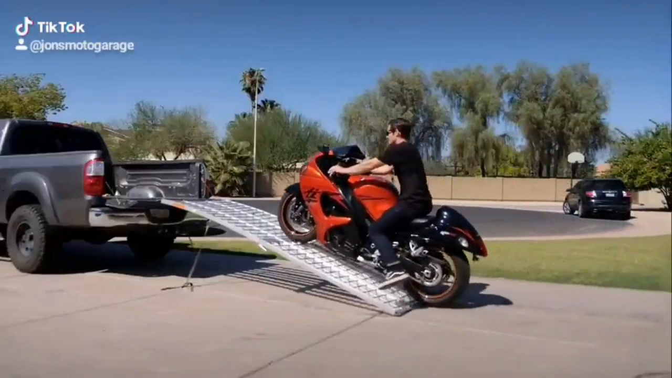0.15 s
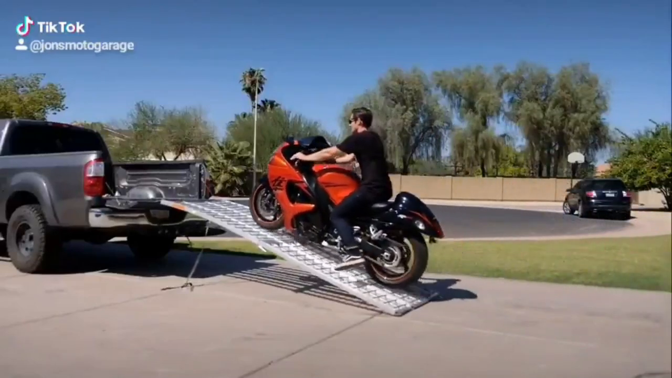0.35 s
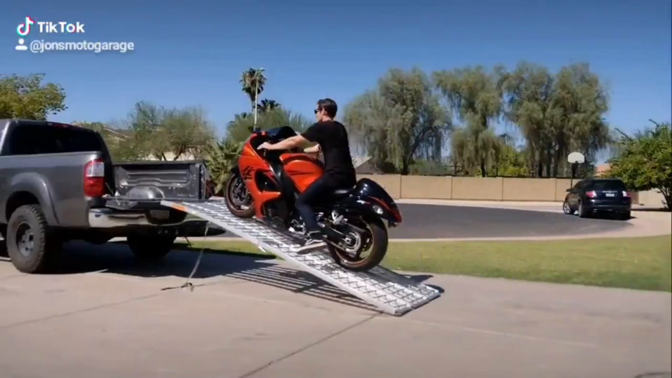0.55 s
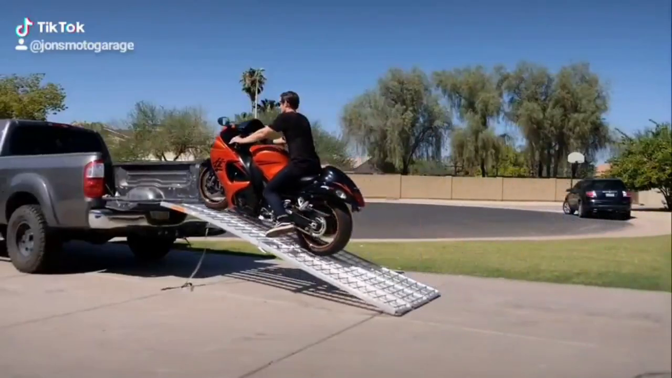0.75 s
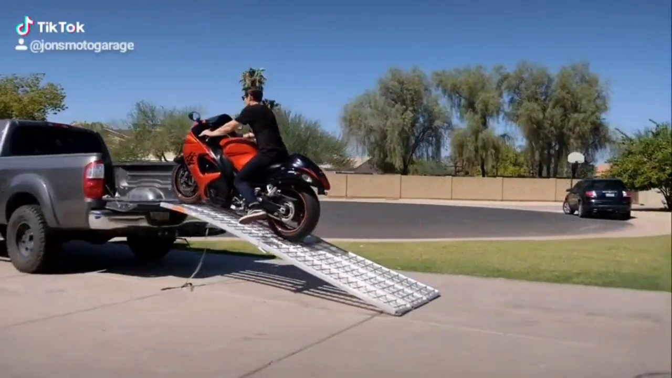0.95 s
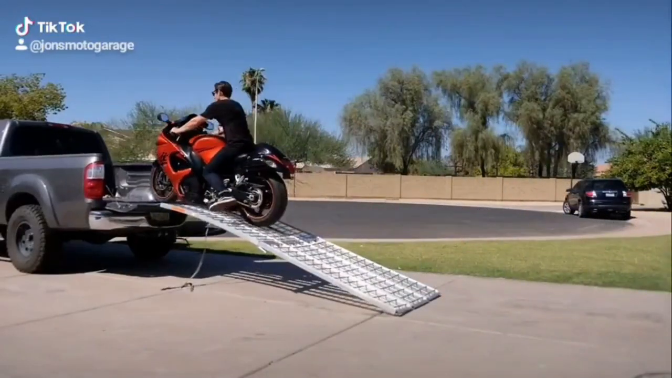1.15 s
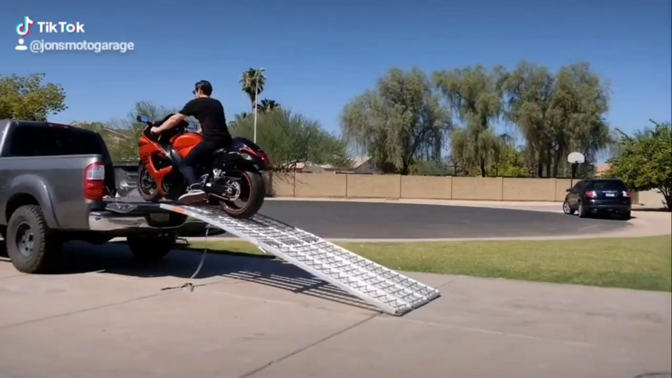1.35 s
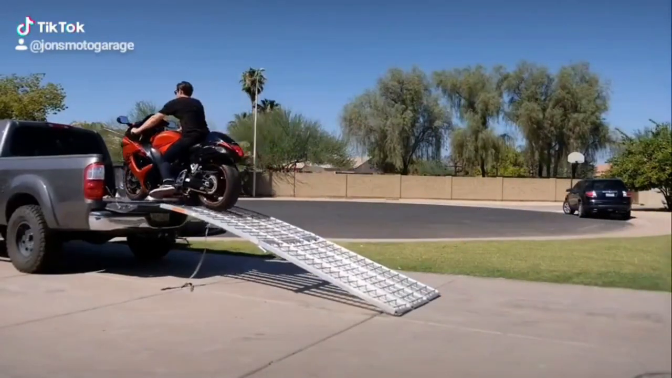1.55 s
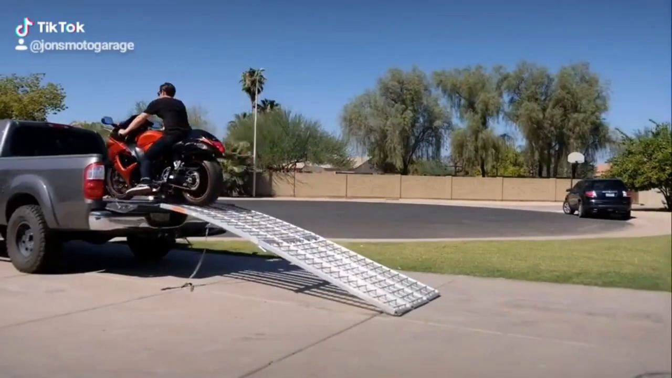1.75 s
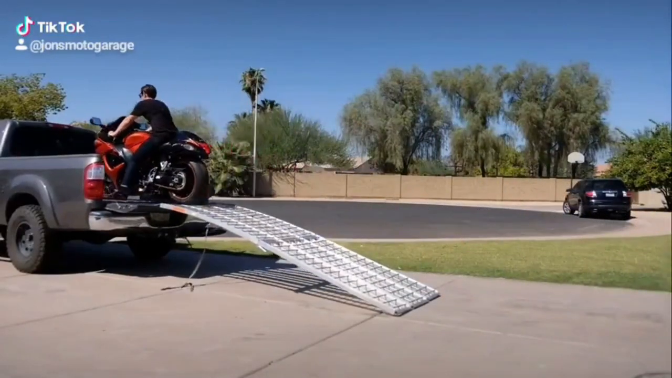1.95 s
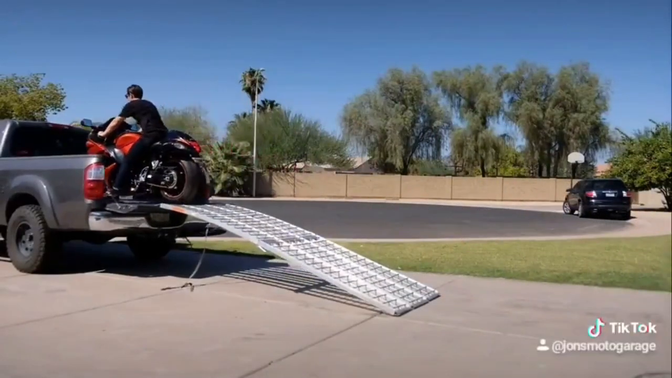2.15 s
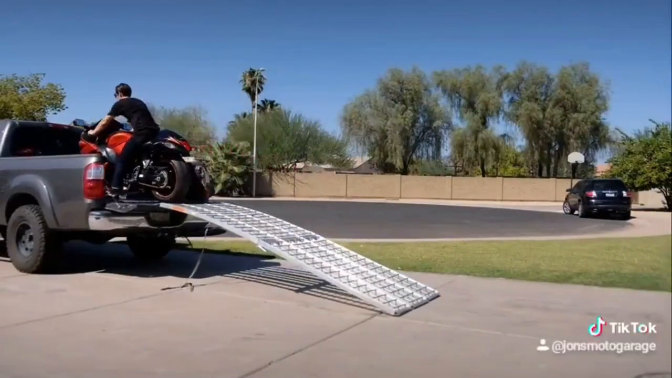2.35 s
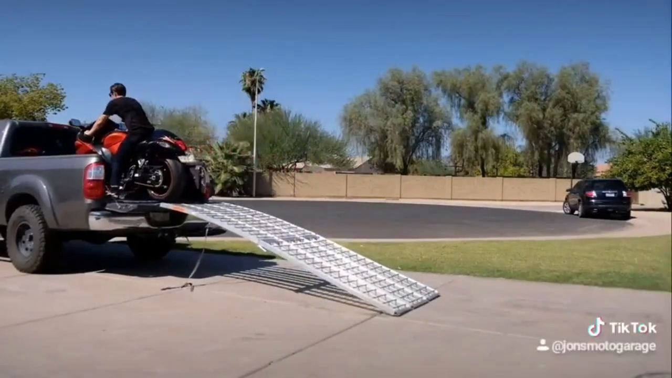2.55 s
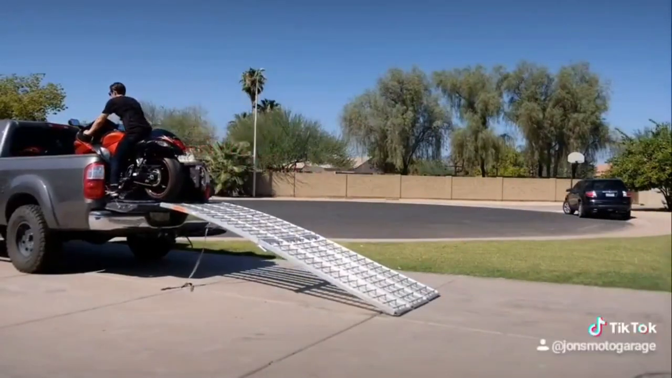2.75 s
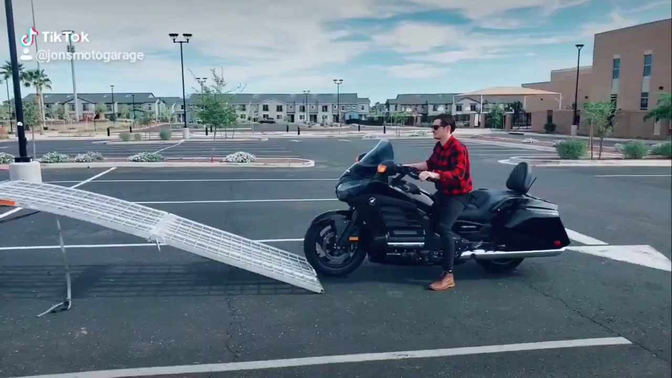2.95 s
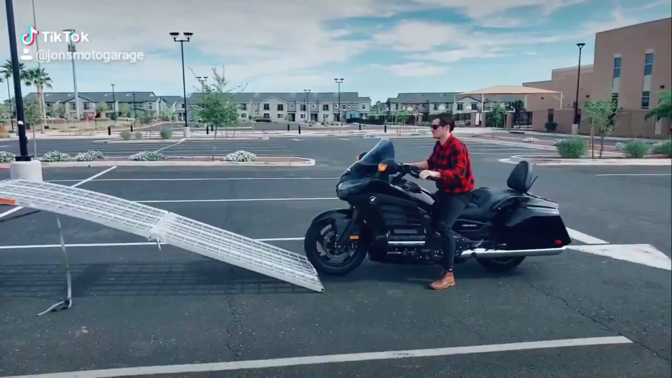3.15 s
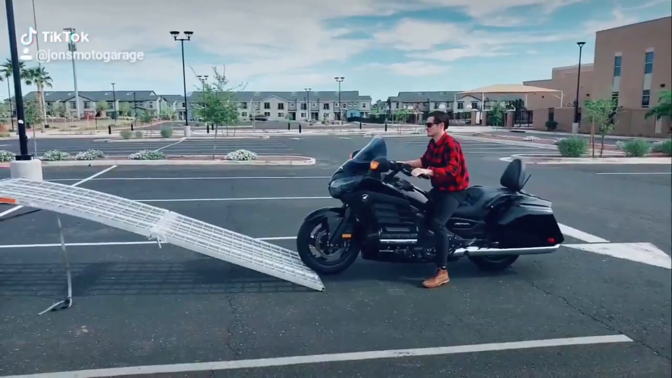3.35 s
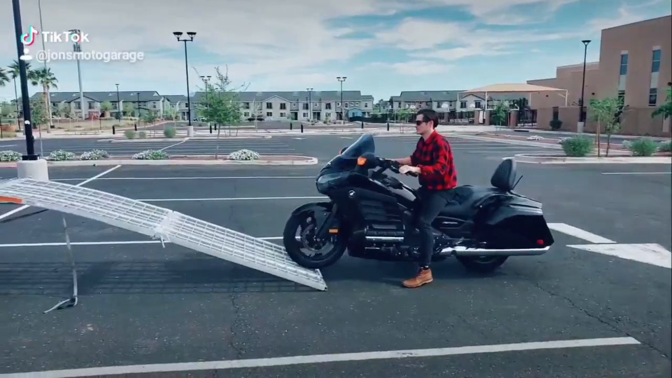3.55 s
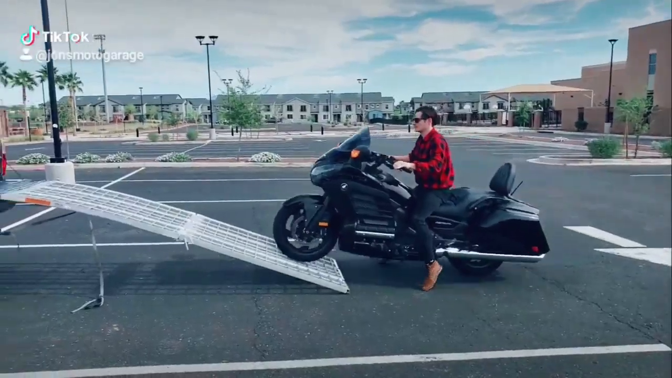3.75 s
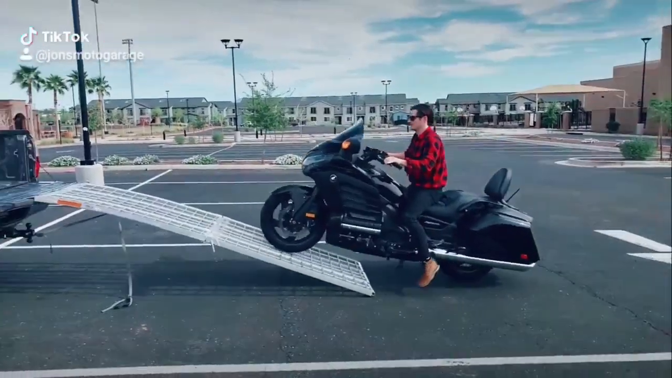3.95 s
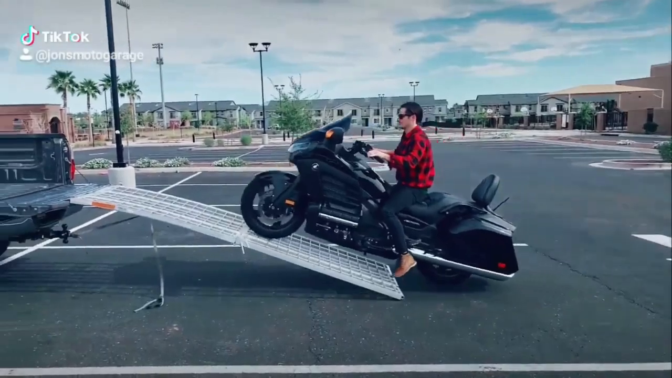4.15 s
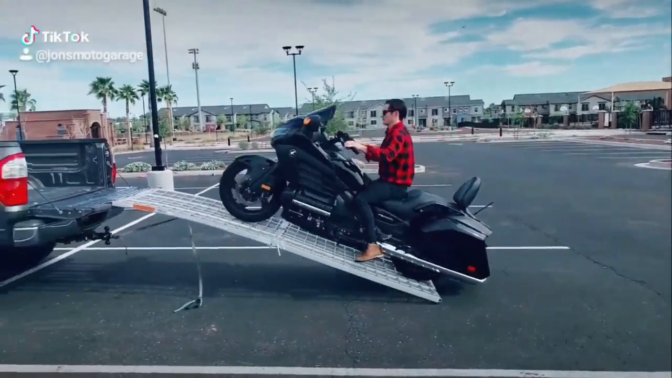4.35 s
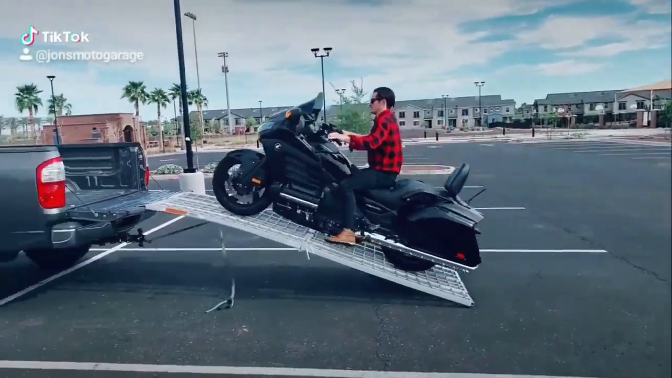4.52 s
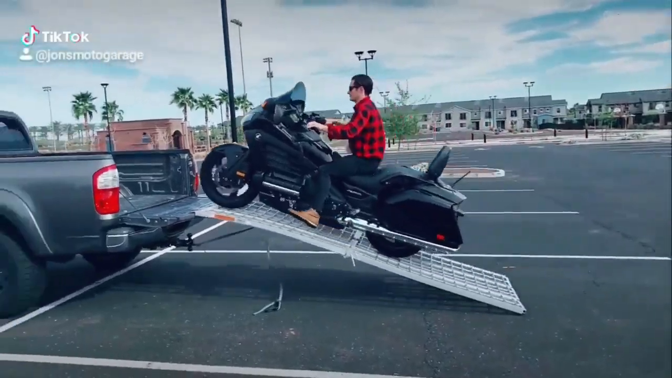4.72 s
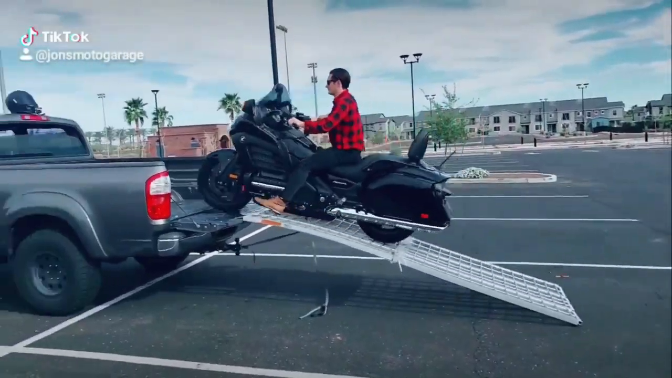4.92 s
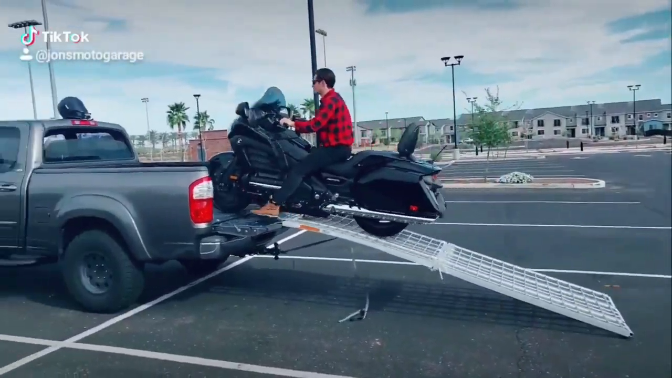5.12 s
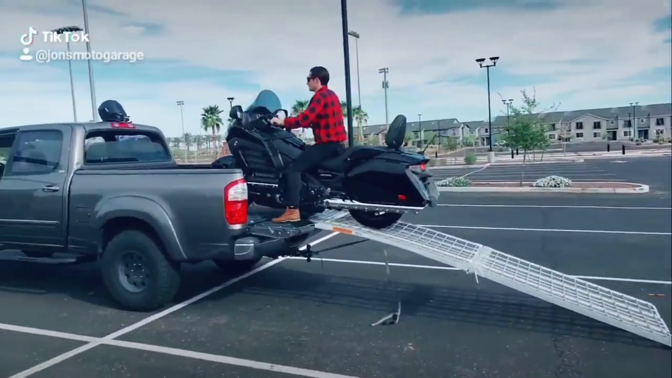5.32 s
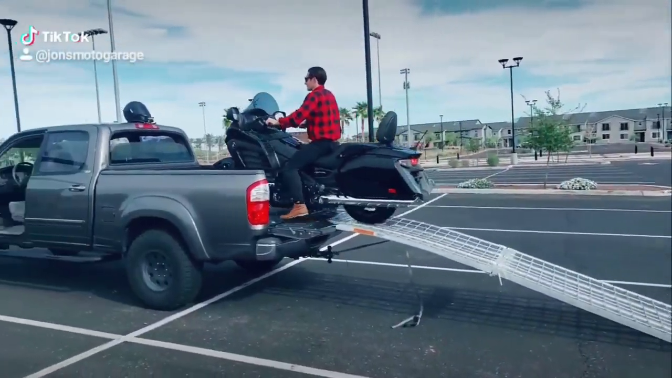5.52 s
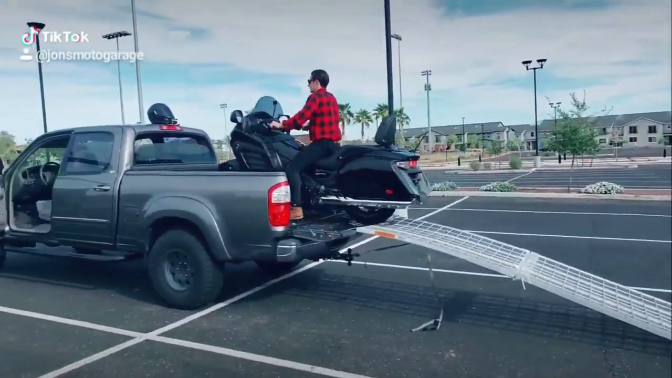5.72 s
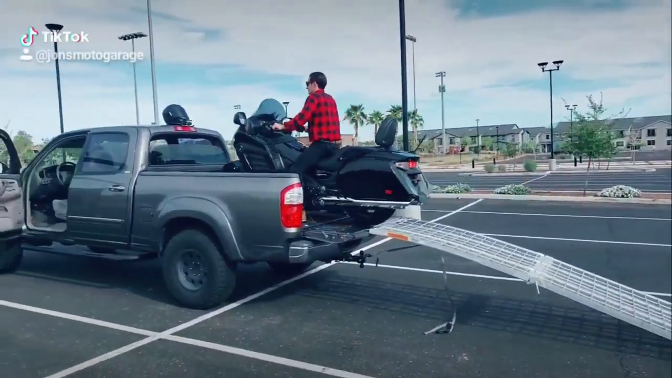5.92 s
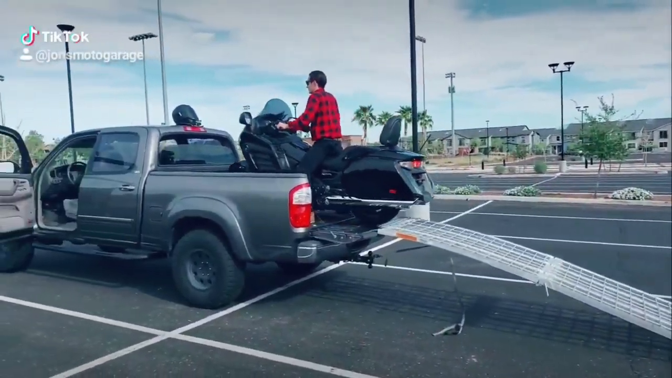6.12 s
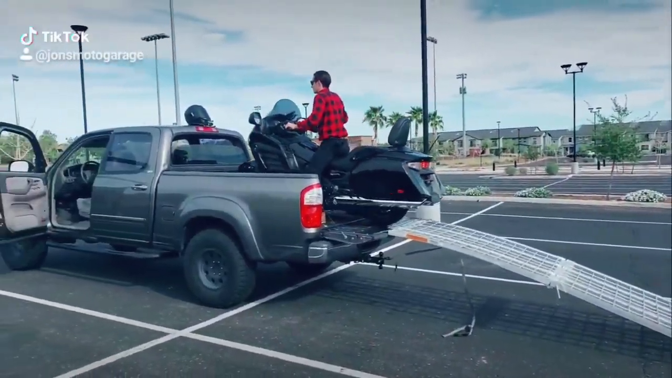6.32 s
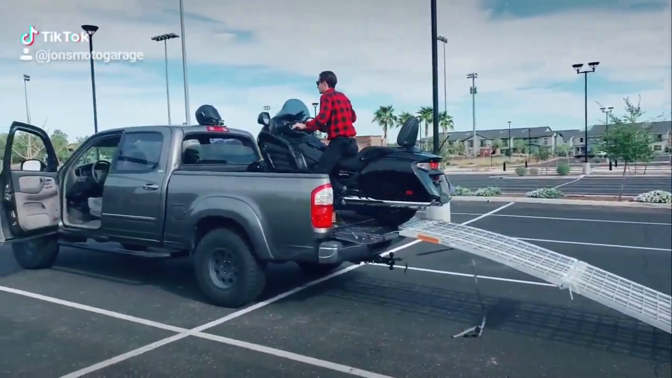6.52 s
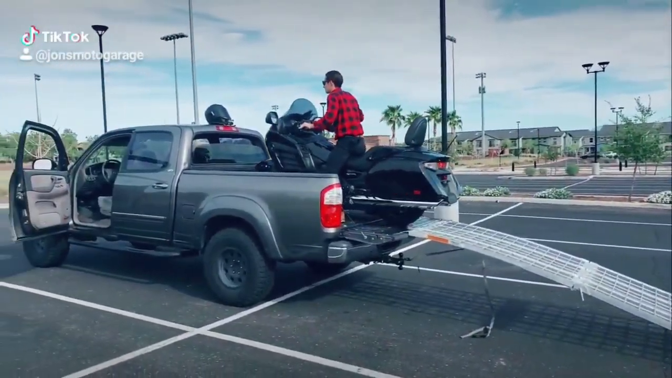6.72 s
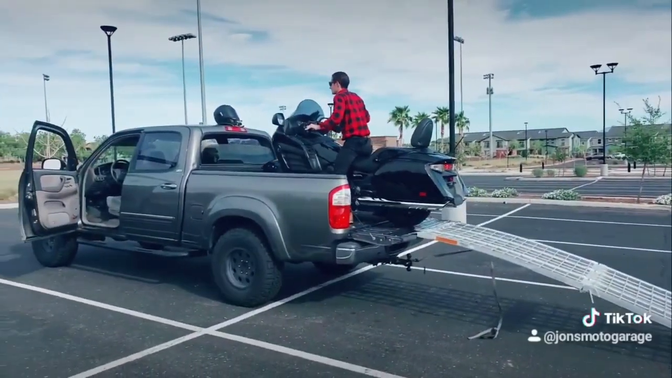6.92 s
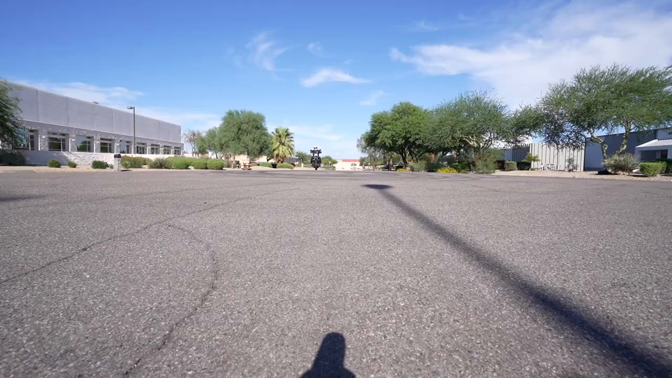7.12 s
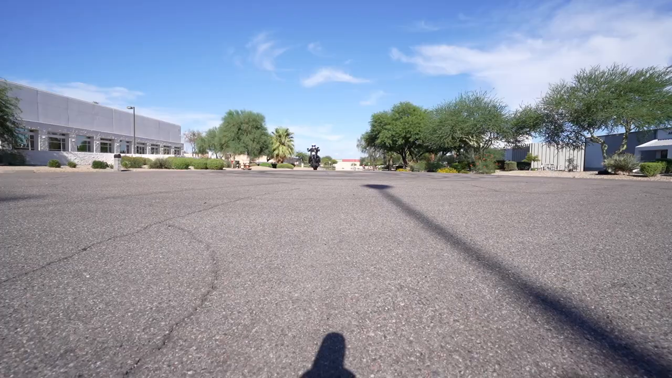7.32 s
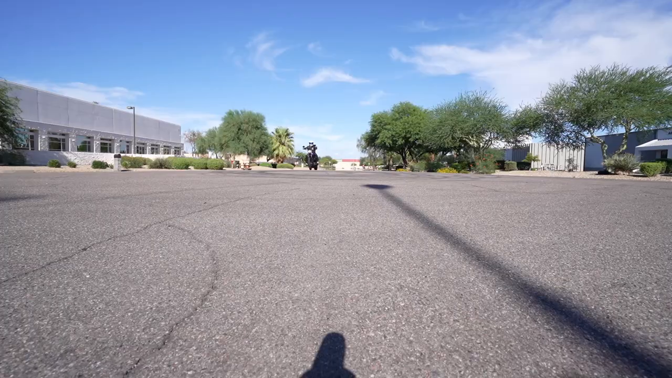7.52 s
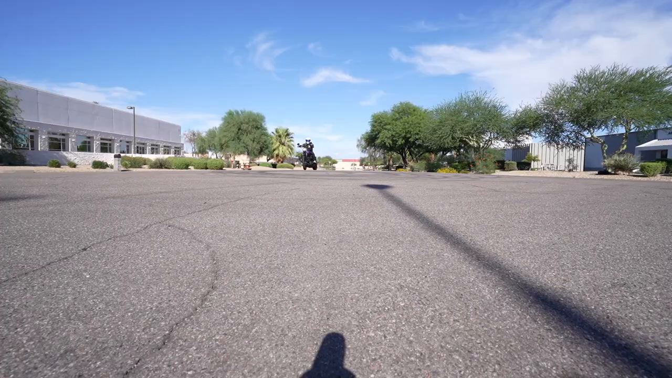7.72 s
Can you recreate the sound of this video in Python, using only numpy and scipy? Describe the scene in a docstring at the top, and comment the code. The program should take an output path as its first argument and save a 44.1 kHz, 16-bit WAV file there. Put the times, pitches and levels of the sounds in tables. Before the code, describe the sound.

A sport motorcycle pulls up a metal loading ramp with a booming engine, then drops to an uneven idle, with two sharp clanks. After an abrupt cut, a deeper touring motorcycle revs with whining gears as the ramp rattles and clanks loudly. It slows and creeps along a truck bed, growing muffled. Finally a distant bike howls briefly at high revs. All is outdoors, with light wind on the microphone.

```python
"""Motorcycles ride up an aluminium ramp into a pickup, in three outdoor scenes cut together.
A four-cylinder sport bike climbs and drops to idle. A six-cylinder touring bike with whining gears
climbs while the ramp rattles and clanks, then creeps along the truck bed. Last, a far bike speeds
across an open lot. Each engine is a stream of pulses, one per firing, shaped by its pipes and casing.
Ramp and truck bed ring when struck. Behind it all are soft outdoor noise and wind on the microphone."""
import sys
import numpy as np
from scipy import signal
from scipy.fft import rfft, irfft, next_fast_len
from scipy.io import wavfile
from scipy.ndimage import uniform_filter1d

SR = 44100
rng = np.random.default_rng(int(sys.argv[2]) if len(sys.argv) > 2 else 0)


def store_pcm(level_fs):
    """Save levels as 16-bit WAV."""
    pcm = np.round(np.clip(level_fs, -1, 1) * 32767).astype(np.int16)
    wavfile.write(sys.argv[1], SR, np.atleast_2d(pcm).T)


N = 342641
TIME = np.arange(N) / SR
FIRST_END_S, SECOND_START_S = 2.857, 2.901   # the gap between the first two scenes

# The revs sag on the ramp, flare at the top, then wander around idle: (time [s], speed [firings/s])
SPORT_SPEED = [(0, 101.4), (.164, 95.8), (.266, 96), (.436, 95), (.622, 96.4), (.694, 89), (.734, 89.7),
               (.96, 94), (1.256, 90.4), (1.31, 96.5), (1.356, 87), (1.45, 74), (1.53, 57), (1.65, 40.3),
               (1.76, 31), (1.88, 48), (1.98, 42.7), (2.06, 43), (2.16, 36.7), (2.3, 42.6), (2.46, 37.5),
               (2.58, 32.1), (2.86, 37.5)]
# Opened for the ramp, eased, shut at the top, then the idle catches: (time [s], throttle [0-1])
SPORT_THROTTLE = [(0, 0.57), (.13, 0.98), (.22, 1), (.45, 1), (.62, 0.83), (.8, 0.76), (.93, 0.76),
                  (1.25, 0.64), (1.315, 0.8), (1.37, 0.24), (1.43, 0.18), (1.73, 0.06), (1.87, 0.39),
                  (2.02, 0.31), (2.3, 0.24)]
# Each cylinder in firing order: (strength [dB])
SPORT_CYLINDERS = [1.6, 1.7, 1.9, 0.041]
# The tone of each part of the sound: (frequency [Hz], level [dB])
SPORT_BOOM = [(25, -29), (42, -14), (70, -7), (95, -4.5), (140, 0.5), (168, 1), (181, 10), (195, 1.5),
              (250, -11.5), (340, -17), (600, -69)]   # deep note of the silencer
SPORT_THUMP = [(40, 8), (75, 7), (115, -9), (150, 6), (300, -56)]   # exhaust with the throttle shut
SPORT_BARK = [(150, -38.5), (235, 6), (285, -3), (335, 1), (385, -5.5), (470, -10), (590, -21.5),
              (900, -61)]   # exhaust with the throttle open
SPORT_RASP = [(380, -40), (520, 5.5), (590, 4), (670, 0.5), (770, 2), (860, -23), (1100, -57.5)]   # tailpipe
SPORT_GROWL = [(250, -33), (340, -4), (385, -4), (420, -15.5), (520, -29)]   # air ringing in the intake
SPORT_CLATTER = [(450, -13.5), (750, -14.5), (950, -10), (1200, -10.5), (1480, -12), (1720, -9),
                 (1850, -11.5), (2500, -15.5), (4100, -20.5), (7500, -34.5), (11000, -38), (14000, -48)]   # valves, chain and intake hiss
# How loud each part gets: (base level [dB], rise per doubling of speed [dB], drop with throttle shut [dB])
SPORT_BOOM_LAW = (-26, 0.89, 10.7)
SPORT_BARK_LAW = (-28.5, 5.1, 14)
SPORT_RASP_LAW = (-38, 34, 8.2)
SPORT_CLATTER_LAW = (-46.5, 5.97, 0.54)
# The boom swells when the revs sag onto the silencer's own note: (time [s], boost [dB])
BOOM_SWELL = [(0, -5), (.12, -2), (.42, -5), (.63, -2), (.82, -1), (.93, -3), (1.27, 0.5), (1.315, -4),
              (1.365, 6), (1.45, -2.5), (1.8, 0), (1.95, -1.5), (2.3, 1.5)]
# The intake growls during the climb: (time [s], level [dB])
GROWL_LEVEL = [(0, -55), (.13, -31), (.42, -29), (.62, -36), (.81, -30), (.93, -39.5), (1.27, -34.5),
               (1.38, -51.5), (1.55, -78)]
# The tailpipe rises above the ground: (time [s], height [m])
PIPE_HEIGHT = [(0, .35), (.2, 0.36), (.42, 0.71), (.6, 0.93), (.9, 1.49), (1.3, 1.51)]

def sport_bike():
    """Firings make the silencer boom, which wavers at idle; opening the throttle adds bark and rasp."""
    speed, = in_time(SPORT_SPEED)
    throttle, = in_time(SPORT_THROTTLE)
    climb_speed, full_boom_throttle, crest_s, echo_s_per_m = 95, .47, 1.315, .0012
    octaves = np.log2(speed / climb_speed)
    pulling = np.minimum(throttle / full_boom_throttle, 1)
    idling = np.interp(speed, [45, 88], [1, 0])

    # Firing turns ragged at the top of the ramp, with the throttle shut, and as the revs sag under load.
    ragged = .3 * np.exp(-((TIME - crest_s) / .03) ** 2)
    burble = np.interp(throttle, [.1, .25], [.3, 0])
    labour = pulling * (1 - idling) * np.interp(speed, [89, 96], [.08, 0])
    pulses = firings(speed, SPORT_CYLINDERS, .11 + ragged + burble + labour, jitter=.1, bank_lag=.025)
    # Echoes from the bike's body and the truck bed fill the gaps between firings.
    scattered = outdoors(pulses, t60=.09, wet_db=6)
    in_bed = even(pulses * (1 - idling) + idling * scattered)

    beats = (1 - .5 * idling) * even(colour(-pulses, SPORT_BOOM))
    drone = 2 * idling * idle_drone(speed)
    waver = from_db(1.5 * idling * drift(16))
    gas_flow = from_db(-21 + 6 * idling) * noise(SPORT_BOOM)
    boom_db = loudness(SPORT_BOOM_LAW, octaves, pulling) + in_time(BOOM_SWELL)[0]
    boom = from_db(boom_db) * waver * even(beats + drone + gas_flow)
    growl = from_db(in_time(GROWL_LEVEL)[0]) * even(colour(-in_bed, SPORT_GROWL))
    bark = from_db(loudness(SPORT_BARK_LAW, octaves, throttle)) * even(colour(-in_bed, SPORT_BARK))
    rasp = from_db(loudness(SPORT_RASP_LAW, octaves, throttle)) * even(colour(scattered, SPORT_RASP))
    # The ground echo comes later as the pipe rises, so it cancels lower and lower tones.
    rasp = rasp + from_db(-8) * delayed(rasp, echo_s_per_m * in_time(PIPE_HEIGHT)[0])
    thump = (1 - pulling) * from_db(-21 + 13 * octaves) * even(colour(-pulses, SPORT_THUMP))

    # Valves tick alike on every cycle; chain and intake hiss do not.
    ticks = even(colour(scattered, SPORT_CLATTER))
    hiss = noise(SPORT_CLATTER, puffs(pulses, decay_s=.005, depth=.25) * from_db(1.5 * drift(40)))
    clatter_db = loudness(SPORT_CLATTER_LAW, octaves, throttle)
    clatter = from_db(clatter_db) * (from_db(-3) * ticks + from_db(-2) * hiss)
    gear = pulling ** 2 * (1 - idling) * sport_gear(speed)
    return boom + growl + bark + rasp + thump + clatter + gear


# What the sport bike's silencer lets through at idle: (frequency [Hz], level [dB])
SILENCER = [(40, -7), (80, -8.5), (118, 0), (155, -19.5), (177, 5), (200, 2.5), (240, -11.5), (300, -20)]

def idle_drone(speed):
    """The silencer rings on between slow firings; its strongest tone hops as the revs wander."""
    phase = 2 * np.pi * np.cumsum(speed) / SR
    tones = sum(from_db(at_hz(SILENCER, k * speed)) * np.cos(k * phase) for k in range(1, 8))
    return even(tones[None])


def sport_gear(speed, teeth_per_firing=18.15):
    """The teeth of the main gear mesh and sing one thin, flickering tone."""
    phase = 2 * np.pi * teeth_per_firing * np.cumsum(speed * (1 + .01 * drift(150))) / SR
    return from_db(-55 + 3.3 * drift(25)) * np.sin(phase)


# The touring bike revs to climb, sinks to idle, then creeps forward: (time [s], speed [firings/s])
TOURER_SPEED = [(2.9, 70), (3.0, 65.5), (3.07, 63), (3.13, 66), (3.2, 75), (3.35, 101.2), (3.59, 114.5),
                (4.04, 113), (4.51, 107), (4.66, 113), (4.8, 106.5), (4.96, 114), (5.25, 78), (5.43, 61),
                (5.55, 52), (5.7, 43.5), (5.93, 33.5), (6.3, 68), (6.42, 77), (6.6, 85), (6.78, 88),
                (6.95, 86), (7.2, 81)]
# Held open, snapped shut at the top, caught again, then worked gently: (time [s], throttle [0-1])
TOURER_THROTTLE = [(3.12, 0.88), (3.32, 0.98), (4.93, 1), (4.98, 0.33), (5.015, 0.79), (5.2, 0.93),
                   (5.4, 0.74), (6.25, 0.62), (6.46, 0.89)]
# Each cylinder in firing order: (strength [dB])
TOURER_CYLINDERS = [0.32, -0.47, 0.42, 0.15, -0.52, 0.18]
# The tone of each part of the sound: (frequency [Hz], level [dB])
TOURER_BOOM = [(25, -49), (55, -1), (80, 3), (110, 8.5), (135, -15), (180, -37.5), (400, -68)]   # both exhaust pipes
TOURER_BARK = [(80, -38), (130, 8.5), (170, -3.5), (220, -2.5), (280, 4), (305, -6.5), (340, -12),
               (450, -42), (700, -66), (1500, -99)]   # the nearer pipe
TOURER_CLATTER = [(240, -16), (400, -2), (466, -10.5), (560, 2), (784, -2.5), (1260, -12), (1450, -2),
                  (1760, -3), (1960, -7.5), (3460, -11), (4700, -19.5), (5650, -15.5), (8800, -26),
                  (11900, -21.5), (15500, -28.5)]   # ticking and hiss
CRANKCASE = [(480, -26), (620, -4), (770, -4.5), (900, -19.5)]   # parts churning inside the engine
# How loud each part gets: (base level [dB], rise per doubling of speed [dB], drop with throttle shut [dB])
TOURER_BOOM_LAW = (-24, 11.4, 53)
TOURER_BARK_LAW = (-24.5, 17.6, 24)
TOURER_CLATTER_LAW = (-34, 12.6, 1)

def tourer():
    """Two rows of three cylinders: the nearer pipe is louder, adding tones at half the firing rate."""
    speed, = in_time(TOURER_SPEED)
    throttle, = in_time(TOURER_THROTTLE)
    climb_speed, gas_flow = 110, from_db(-17)
    octaves = np.log2(speed / climb_speed)
    # The truck's side gradually hides the bike; the deep boom bends around it.
    hidden = np.interp(TIME, [4.98, 6.42], [0, 1])
    boom_db = loudness(TOURER_BOOM_LAW, octaves, throttle)
    bark_db = loudness(TOURER_BARK_LAW, octaves, throttle) - 28 * hidden
    clatter_db = loudness(TOURER_CLATTER_LAW, octaves, throttle) - 13.5 * hidden

    rough = np.interp(speed, [60, 100], [.25, .045])
    pulses = firings(speed, TOURER_CYLINDERS, rough, jitter=.12)
    near_pipe = firings(speed / 2, TOURER_CYLINDERS[::2], rough, jitter=.0543)
    gate = puffs(pulses, decay_s=.0025, depth=.15)
    boom = from_db(boom_db) * (even(colour(-pulses, TOURER_BOOM)) + gas_flow * noise(TOURER_BOOM))
    bark = even(colour(-near_pipe, TOURER_BARK)) + gas_flow * noise(TOURER_BARK, gate)
    ticks = even(colour(outdoors(near_pipe, t60=.15, wet_db=34), TOURER_CLATTER))
    hiss = noise(TOURER_CLATTER, gate * from_db(1.2 * drift(60)))
    clatter = from_db(clatter_db) * (from_db(-6.5) * ticks + from_db(-2.5) * hiss)
    churn = from_db(-58) * noise(CRANKCASE, gate)
    return boom + from_db(bark_db) * bark + churn + clatter + tourer_whine(speed, throttle, hidden)


# Gear and alternator tones: (pitch [times the firing rate], base level idling [dB], pulling [dB])
WHINE_TONES = [(8.36, -61, -55), (12.5, -70, -60), (16.7, -57, -62), (25, -70, -60), (37.5, -76, -61),
               (50, -60, -62), (75, -65, -79), (100, -70, -88)]
# The whole whine swells and fades: (time [s], boost [dB])
WHINE_SWELL = [(2.9, 3), (3.2, 3), (3.37, -2), (3.6, 2), (4.05, 4), (4.5, -2), (5.4, -7), (5.7, -4),
               (6.1, -8), (6.4, -3), (6.7, 0), (7.1, -1)]
# How well the engine casing gives off each pitch: (frequency [Hz], boost [dB])
CASING = [(400, -10), (720, -5.5), (1000, -5), (1450, 2), (1700, -2), (2000, -9), (2250, 3), (2600, -6),
          (2950, -3), (3300, 6.5), (3800, 3), (4400, 4), (4900, -2), (5650, 3), (6150, -2), (8000, -29)]

def tourer_whine(speed, throttle, hidden):
    """Gears and alternator sing along with the revs and swell where they match the casing's own notes."""
    pulling = np.interp(speed, [62, 86], [0, 1])
    # Under load the engine's uneven push rattles the teeth and roughens the tones.
    ripple = np.interp(throttle, [.82, .95], [.013, .022])
    phase = 2 * np.pi * np.cumsum(speed * (1 + ripple * drift(260))) / SR
    swell_db, = in_time(WHINE_SWELL)
    tones = 0
    for multiple, idle_db, pull_db in WHINE_TONES:
        hz = multiple * speed
        blocked_db = hidden * 3.5 * np.maximum(np.log2(hz / 700), 0)   # the truck blocks high tones most
        db = idle_db + pulling * (pull_db - idle_db) + at_hz(CASING, hz) - blocked_db
        flicker_db = 3 * drift(45) + 2 * drift(11)
        tones = tones + from_db(db + flicker_db) * np.sin(multiple * phase)
    return outdoors(from_db(swell_db) * tones, t60=.012, wet_db=4)


# The far bike's revs dip at a gear change: (time [s], speed [firings/s])
FAR_SPEED = [(7.1, 245), (7.2, 230), (7.25, 202), (7.31, 201), (7.36, 207), (7.41, 154), (7.47, 188),
             (7.53, 190), (7.59, 199), (7.66, 186), (7.71, 207), (7.77, 220)]
# Each cylinder in firing order: (strength [dB])
FAR_CYLINDERS = [2.5, -9, -12, -12]
# Its four clearest exhaust tones: (pitch [times the firing rate])
FAR_MULTIPLES = [3, 4, 4.5, 6]
# How strong those tones are: (time [s], first [dB], second [dB], third [dB], fourth [dB])
FAR_TONE_LEVELS = [(7.24, -38, -38, -47, -59), (7.32, -31, -18.5, -23.5, -40), (7.41, -27.5, -48, -44, -28),
                   (7.47, -27, -40, -49, -26.5), (7.53, -22, -29, -48, -29), (7.6, -27.5, -25, -36, -28),
                   (7.66, -26, -48, -38, -37), (7.77, -20, -25, -51, -42)]
# The tone of its howl, rasp and low rumble: (frequency [Hz], level [dB])
FAR_HOWL = [(250, -43.5), (420, -3), (500, -1.5), (590, 5.5), (720, 1), (800, 4.5), (860, 2), (950, -2),
            (1180, -6), (1400, -24), (2200, -69.5)]
FAR_RASP = [(710, 0), (1200, -4), (1320, -1.5), (1700, -1), (2150, -7), (2850, -8.5), (3210, -16),
            (4090, -21), (5320, -30), (15000, -51)]
FAR_RUMBLE = [(15, -46), (25, -23), (65, 1.5), (146, -11.5), (216, -4), (296, -17.5), (400, -12),
              (520, -43), (880, -120)]

def far_bike():
    """High revs give clear exhaust tones and a roar smeared by echoes from buildings, over a rumble."""
    speed, = in_time(FAR_SPEED)
    full_s, swell_db_per_s, approach_db_per_s, rumble_fall_db_per_s = 7.24, 256, 22.5, 15
    since = TIME - full_s
    swell_db = swell_db_per_s * np.minimum(since, 0)
    rasp_db = -33 + swell_db + approach_db_per_s * since   # the rasp grows as the bike nears
    rumble_db = -28.5 - rumble_fall_db_per_s * np.maximum(since, 0)
    pulses = firings(speed * (1 + .006 * drift(40)), FAR_CYLINDERS, rough=.28, jitter=.098)
    pulses = outdoors(pulses, t60=.7, wet_db=2.5)
    howl = from_db(-26 + swell_db) * even(colour(pulses, FAR_HOWL) + .21 * noise(FAR_HOWL))
    rasp = from_db(rasp_db) * even(colour(pulses, FAR_RASP) + .11 * noise(FAR_RASP))
    phase = 2 * np.pi * np.cumsum(speed * (1 + .008 * drift(90))) / SR
    tones = sum(from_db(db + swell_db + 2 * drift(50)) * np.sin(multiple * phase)
                for multiple, db in zip(FAR_MULTIPLES, in_time(FAR_TONE_LEVELS)))
    return outdoors(tones, t60=.35, wet_db=-15) + howl + rasp + from_db(rumble_db) * noise(FAR_RUMBLE)


# Tyres and frame knock the ramp:
# (time [s], strength [dB], brightness [dB], ringing [dB], rattle length [s], pitch of the spot [Hz])
CLANKS = [(1.165, -23, -17.5, -2, 0.023, 1252), (1.39, -41.5, -36, -5, 0.13, 1500),
          (2.081, -22, -16.5, 4, 0.016, 1340), (4.527, -28.5, -8, 4, 0.02, 3495),
          (4.565, -24.5, 1.5, 2, 0.021, 3760), (4.6, -25, -4, 4, 0.023, 3800),
          (4.719, -30, -4, 1, 0.013, 3400), (4.753, -29.5, -4, 0, 0.033, 3505),
          (4.792, -28, -7, 6, 0.029, 2600), (4.823, -22.5, -9.5, 1, 0.024, 3200),
          (4.856, -23.5, -7, -4, 0.017, 2020), (4.889, -25.5, -11, -1, 0.12, 3100),
          (4.994, -11.5, -10, -0.5, 0.026, 1770), (5.058, -24.5, -9.5, 3, 0.031, 1377),
          (5.161, -44, 9, -3, .012, 2500), (5.176, -24.5, -20, -2, 0.03, 1680),
          (5.269, -36, -13, 1.5, 0.064, 2290), (5.347, -40, -17, 5, 0.027, 1610),
          (5.957, -21, -5.5, 5, 0.02, 1930), (6.056, -41, -16.5, -1.5, 0.065, 1690),
          (6.263, -52.5, -11, 2, 0.051, 2300), (6.565, -46.5, -12, 0, 0.027, 1440)]
# The notes the ramp rings at: (frequency [Hz], level [dB], time to fade by 60 dB [s])
RAMP_NOTES = [(658.4, -0.5, 0.39), (725, -23, 0.21), (1060, -7, 0.11), (1212, -13, 0.44), (1240, -29, 0.19),
              (1317.5, -3.5, 0.09), (1420, -6, 0.11), (1567, -1, 0.037), (1767, -5.5, 0.1),
              (1880, -14, 0.28), (2030, -6.5, .08), (2170, -18, 0.13), (2390, -0.5, 0.012),
              (3059, -5, 0.031), (3357, -4, 0.018), (3630, 0, 0.011), (4430, -5.5, 0.018),
              (5600, -24, 0.22), (6250, -10, .06)]
# The ramp's dense ringing, and the bright clash of metal on metal: (frequency [Hz], level [dB])
RAMP_BODY = [(100, -2), (205, 13.5), (300, 4.5), (450, -6), (750, 6), (1050, -2), (1500, -1), (2300, 0.5),
             (2900, -8), (3700, -10), (5500, -17.5), (12000, -47)]
METAL_CONTACT = [(1500, -102), (3500, 20), (6500, 23.5), (9000, 15.5), (13000, 15.5), (16000, -2)]

def ramp():
    """Rolling tyres and single knocks shake the loose rungs: bursts of tiny hits on the aluminium."""
    force = rung_chatter()
    bright = force * from_db(-24)
    note_force = np.tile(force * from_db(-17.5), (len(RAMP_NOTES), 1))
    note_hz = np.array(RAMP_NOTES)[:, :1]
    for start_s, strength_db, bright_db, ring_db, length_s, spot_hz in CLANKS:
        hit_span, hit = knock(start_s, strength_db, length_s)
        settle = knock(start_s + .0096, strength_db - 7, length_s=.054)   # a dull second blow
        bright[hit_span] += hit * from_db(bright_db)
        # Notes near the pitch of the struck spot take most of the blow.
        octaves_away = np.minimum(np.abs(np.log2(note_hz / spot_hz)), 1.2)
        for span, burst in (hit_span, hit), settle:
            force[span] += burst
            note_force[:, span] += burst * from_db(ring_db - 13.5 * octaves_away)
    grit = rng.uniform(-.74, 1, (2, N))
    spikes = rng.random(N) < 2500 / SR
    impacts = rms_one(stereo(grit * (.5 + spikes)))
    notes = sum(from_db(db) / np.sqrt(t60 * SR) * ring(push * impacts, hz, t60)
                for push, (hz, db, t60) in zip(note_force, RAMP_NOTES))
    notes = delayed(notes, .0009 * drift(14))   # the ramp flexes, so its notes waver

    # With the touring bike's weight off it, the ramp loses its low thud.
    empty_s, empty_cut_hz = 5.6, 210
    loaded = colour(force * impacts, RAMP_BODY)
    empty = signal.sosfilt(signal.butter(2, empty_cut_hz, "high", fs=SR, output="sos"), loaded)
    body = np.where(TIME < empty_s, loaded, empty)
    contact = colour(bright * impacts, METAL_CONTACT)
    return outdoors(from_db(-2) * body + from_db(8.5) * notes + from_db(2) * contact, t60=.15, wet_db=-15)


def knock(start_s, strength_db, length_s, rise_s=.004):
    """One blow rises quickly and dies away; gives the samples it covers and its force."""
    start = int(start_s * SR)
    age = TIME[:min(N - start, SR // 2)]
    rise = (1 - np.exp(-age / rise_s)) ** 2
    decay = np.exp(-age / max(length_s / 2, .002))
    return slice(start, start + len(age)), from_db(strength_db) * rise * decay


def rung_chatter():
    """Loose rungs tap and rub under the tyres, hardest as the touring bike crosses the ramp's arch."""
    arch_s, rise_db_per_s, fall_db_per_s = 4.707, 20, 26
    taps_per_s, rubbing = 220, .5
    fade_db = np.maximum(rise_db_per_s * (arch_s - TIME), fall_db_per_s * (TIME - arch_s))
    level = from_db(-28 - fade_db + 2 * drift(40)) * (TIME > SECOND_START_S)
    taps = (rng.random(N) < taps_per_s / SR) * rng.uniform(.4, 1, N)
    return level * rms_one(rubbing + die_away(taps, decay_s=.0025))


# Weight drops onto the truck bed: (time [s], strength [dB])
BED_THUDS = [(5.003, -29), (5.967, -41)]
# The notes the bed rings at: (frequency [Hz], level [dB], time to fade by 60 dB [s])
BED_NOTES = [(165, -6, 0.249), (198, -3, 0.61), (259, -6, .15)]

def truck_bed():
    """The steel bed booms briefly when weight drops onto it."""
    blows = np.zeros(N)
    for start_s, db in BED_THUDS:
        blows[int(start_s * SR)] = from_db(db)
    notes = sum(from_db(db) * ring(blows, hz, t60) for hz, db, t60 in BED_NOTES)
    return outdoors(notes, t60=.15, wet_db=-6.5)


# Wind is strongest while the microphone moves along with the touring bike: (time [s], level [dB])
WIND_LEVEL = [(2.9, -63), (3.6, -51), (4.2, -35.5), (5.0, -46), (5.6, -62), (7.3, -62)]
# Its low rumble: (frequency [Hz], level [dB])
WIND_TONE = [(20, -23), (40, -8), (70, -9.5), (150, -7.5), (400, -24)]

def wind():
    """Wind brushes the left and right openings of the microphone separately."""
    level = from_db(in_time(WIND_LEVEL)[0] + 1.3 * drift(25))
    return level * rms_one(colour(rng.standard_normal((2, N)), WIND_TONE))


# The outdoor background: (frequency [Hz], level [dB])
AIR_TONE = [(15, -38), (25, -20), (112, 0), (231, -11), (450, -27.5), (749, -16.5), (952, -28.5),
            (1810, -29), (2930, -47.5), (3730, -36), (12100, -59.5), (15000, -68)]

def open_air():
    """A steady low rumble with a faint hiss."""
    return noise(AIR_TONE)


def firings(speed, cylinders, rough, jitter, bank_lag=0):
    """One pulse per firing; burns vary, and a longer pipe (bank_lag) delays every second pulse."""
    count = np.cumsum(speed) / SR
    k = np.arange(int(count[-1]))
    chance = rng.standard_normal((4000, 2))[k]
    unsteady = np.interp(k, count, np.broadcast_to(rough, N))
    due = k + bank_lag * (k % 2) + jitter * unsteady * chance[:, 0]
    at = np.interp(due, count, np.linspace(0, N - 2, N))
    strength = from_db(np.array(cylinders)[k % len(cylinders)]) * np.exp(unsteady * chance[:, 1])
    whole, part = at.astype(int), at % 1   # each pulse is shared between two samples
    return np.bincount(whole, strength * (1 - part), N) + np.bincount(whole + 1, strength * part, N)


def loudness(law, octaves, throttle):
    """Level in dB of one part of an engine; octaves counts doublings above climbing speed."""
    full_db, db_per_octave, shut_db = law
    return full_db + db_per_octave * octaves - shut_db * (1 - throttle)


def puffs(pulses, decay_s, depth):
    """A volume curve that jumps at each firing and sinks back."""
    return 1 + depth * rms_one(die_away(pulses, decay_s))


def die_away(clicks, decay_s):
    """Give each click a fading tail."""
    return signal.lfilter([1], [1, -np.exp(-1 / (decay_s * SR))], clicks + 1e-18)


def ring(clicks, hz, t60):
    """Each click starts a pure tone that fades by 60 dB in t60 seconds."""
    fade, step = from_db(-60 / (t60 * SR)), 2 * np.pi * hz / SR
    return signal.lfilter([0, np.sin(step)], [1, -2 * fade * np.cos(step), fade * fade], clicks + 1e-18)


def outdoors(x, t60, wet_db):
    """Add echoes from truck, ground and walls, different at each ear; wet_db sets their level."""
    t = TIME[:SR // 2]
    scatter = rng.standard_normal((2, len(t))) * from_db(-60 * t / t60) * (t > .004)
    scatter /= np.linalg.norm(scatter, axis=1, keepdims=True)
    echoes = signal.oaconvolve(np.broadcast_to(x, (2, N)), scatter, axes=1)[:, :N]
    return x + from_db(wet_db) * stereo(echoes)


# How alike the two ears hear each pitch: (frequency [Hz], likeness [0-1])
EAR_LIKENESS = [(100, 1), (400, 0.97), (900, 0.89), (2000, 0.65), (4000, 0.13), (14000, 0.022)]

def stereo(pair):
    """Mix two unrelated signals so that the ears agree in the bass and differ in the treble."""
    size = next_fast_len(N)
    alike = np.clip(at_hz(EAR_LIKENESS, np.arange(size // 2 + 1) * SR / size), -.99, .999)
    mid, side = rfft(pair, size) * np.sqrt([(1 + alike) / 2, (1 - alike) / 2])
    return irfft([mid + side, mid - side], size)[:, :N]


def colour(x, spectrum, size=8192):
    """Give a sound the tone in a table, with a filter that rings only after each pulse."""
    hz = np.arange(size // 2 + 1) * SR / size
    octaves_outside = np.abs(np.log2((hz + 1) / np.clip(hz + 1, spectrum[0][0], spectrum[-1][0])))
    cepstrum = irfft(np.log(from_db(at_hz(spectrum, hz) - 12 * octaves_outside)))
    # Folding the second half onto the first makes the ringing start at once (minimum phase).
    cepstrum[1:size // 2] *= 2
    cepstrum[size // 2 + 1:] = 0
    response = irfft(np.exp(rfft(cepstrum)))
    response = response / np.linalg.norm(response)
    return signal.oaconvolve(np.atleast_2d(x), response[None], axes=1)[:, :N]


def noise(spectrum, gate=1):
    """Stereo noise with the given tone and average level 1; gate is its volume curve."""
    return rms_one(colour(stereo(rng.standard_normal((2, N)) * gate), spectrum))


def delayed(x, delay_s):
    """Delay each channel by a time that may keep changing."""
    return np.array([np.interp(TIME - delay_s, TIME, channel) for channel in x])


def even(x, span_s=.078):
    """Hold the short-term level at 1."""
    power = uniform_filter1d(np.mean(x ** 2, axis=0), int(span_s * SR))
    return x / np.sqrt(np.maximum(power, 0) + 1e-12)


def drift(rate):
    """Glide to a new random value, of size about 1, rate times a second."""
    knots = rng.standard_normal(4000)
    return np.interp(TIME * rate, np.arange(len(knots)), knots)


def in_time(rows):
    """Turn a table that starts with a time column into one curve per other column."""
    times, *columns = np.transpose(rows)
    return [np.interp(TIME, times, column) for column in columns]


def at_hz(points, hz):
    """Look up a frequency in a table, gliding between rows by musical pitch."""
    points = np.array(points)
    return np.interp(np.log(hz + 1), np.log(points[:, 0]), points[:, 1])


def rms_one(x):
    """Scale to an average level (rms) of 1."""
    return x / np.sqrt(np.mean(x ** 2) + 1e-20)


def from_db(db):
    """Turn decibels into a volume factor."""
    return 10 ** (np.asarray(db) / 20)


def scene():
    """A hard cut and a moment of silence after the first scene, then a short blend into the last."""
    first = TIME < FIRST_END_S
    later = np.clip((TIME - SECOND_START_S) / .004, 0, 1)
    far_share, = in_time([(7.13, .0062), (7.17, .88)])
    tourer_share, = in_time([(7.15, .75), (7.32, .29)])
    lean_left = from_db([[.75], [-.75]])
    background = open_air() * (from_db(-45) * first + from_db(-49.5) * later) + later * wind()
    bikes = first * sport_bike() + later * tourer_share * lean_left * tourer() + far_share * far_bike()
    return bikes + ramp() + truck_bed() + background


def record(dry, cutoff_hz=15450):
    """Cut away the very highest treble."""
    return signal.sosfilt(signal.ellip(10, .1, 90, cutoff_hz, fs=SR, output="sos"), dry)


dry = scene()
out = record(dry)
store_pcm(out)
```